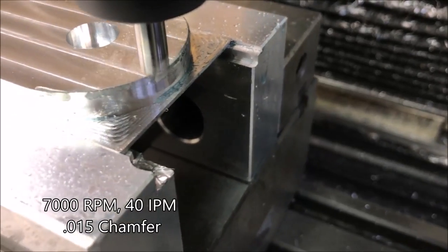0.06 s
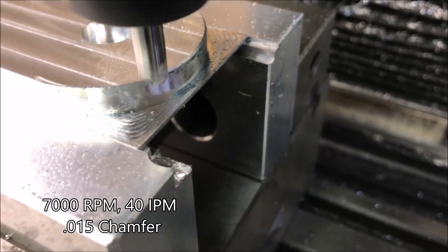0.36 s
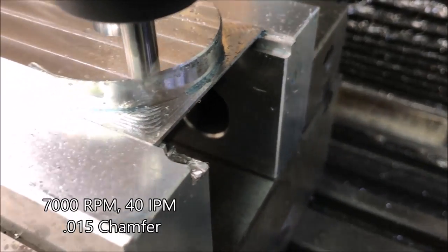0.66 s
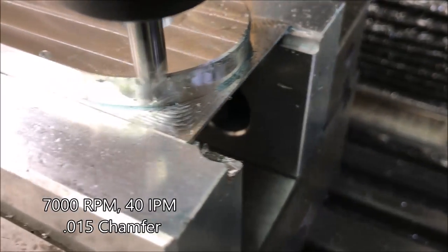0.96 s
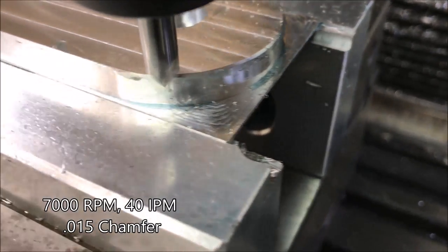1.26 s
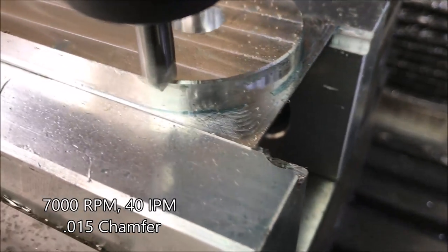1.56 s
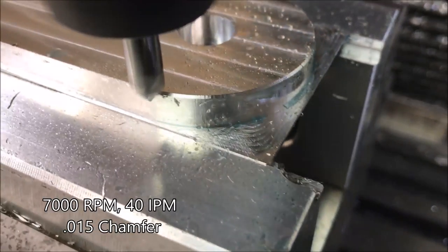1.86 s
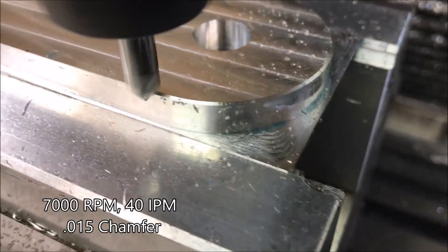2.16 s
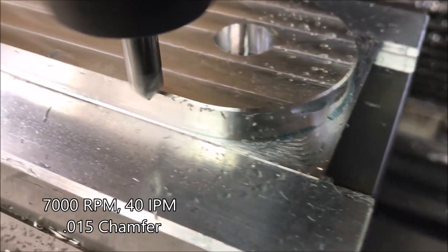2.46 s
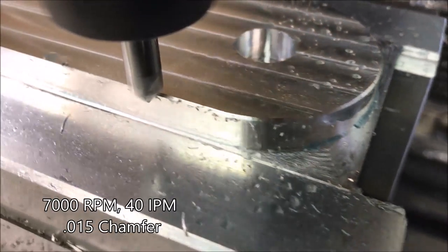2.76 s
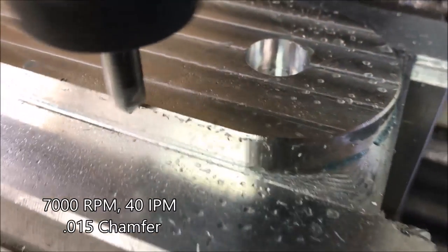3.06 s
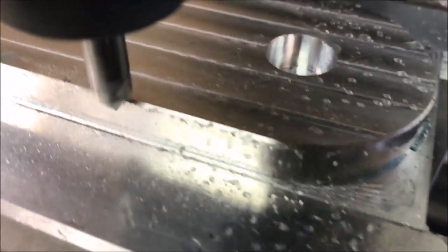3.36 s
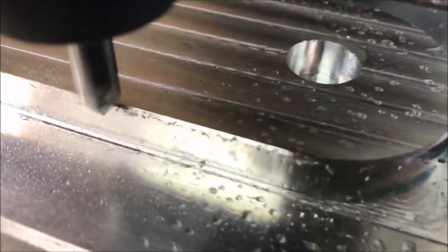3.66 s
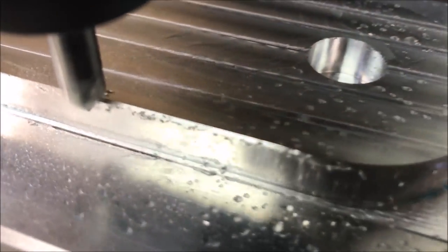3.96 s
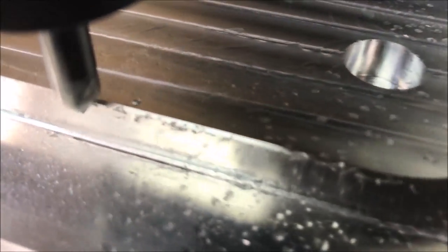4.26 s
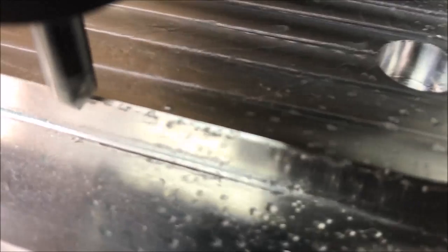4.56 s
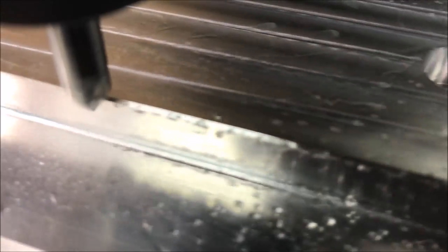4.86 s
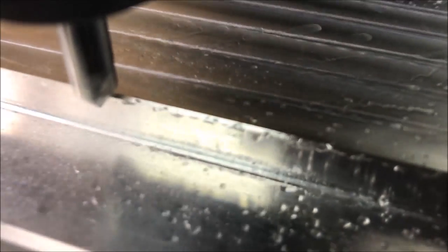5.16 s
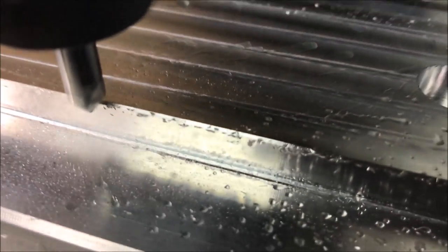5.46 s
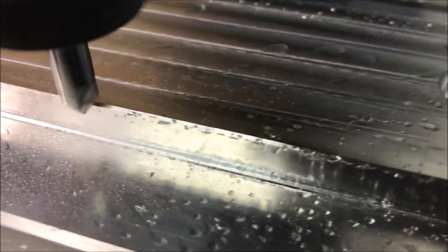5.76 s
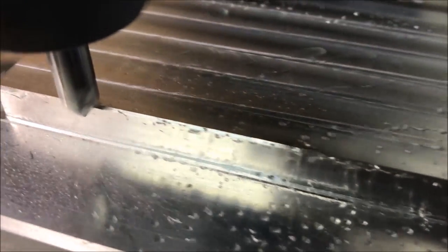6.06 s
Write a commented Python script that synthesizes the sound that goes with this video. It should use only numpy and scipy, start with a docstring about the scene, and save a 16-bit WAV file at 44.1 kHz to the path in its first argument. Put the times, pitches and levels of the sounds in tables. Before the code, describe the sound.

Coolant mist hisses close by over a humming milling machine, as the cutter rasps along metal and the spray starts to flutter.

```python
"""A milling machine chamfers an aluminium part in its enclosure, close to a hand-held mono microphone.
From the start, coolant mist hisses over panel rumble, motor hum and spindle tones, with a few dull bumps.
In the first second the cutter rounds a corner: the table's drive growls and the hum swells.
Then it settles into the straight edge, and the rasp of the chips and a feed whine come up.
From about 2 s the hiss flutters; throughout, echoes off nearby metal colour it as the microphone moves."""
import sys
import numpy as np
from scipy import signal
from scipy.fft import rfft, irfft, next_fast_len
from scipy.io import wavfile
from scipy.ndimage import map_coordinates

SR = 44100
rng = np.random.default_rng(int(sys.argv[2]) if len(sys.argv) > 2 else 0)


def store_pcm(level_fs):
    """Save levels as 16-bit WAV."""
    pcm = np.round(np.clip(level_fs, -1, 1) * 32767).astype(np.int16)
    wavfile.write(sys.argv[1], SR, np.atleast_2d(pcm).T)


N = 277830

# Brief dips in the hiss, the longer the deeper: (time [s], length [s])
HISS_DIPS = [(1.976, .012), (2.021, .014), (2.059, 0.011), (2.147, .01), (2.339, 0.016), (2.55, 0.015),
             (2.615, 0.017), (3.105, 0.01), (3.257, 0.0086), (3.395, 0.029), (3.639, 0.015), (3.865, 0.03),
             (4.085, 0.017), (4.153, 0.015), (4.281, 0.0095), (4.321, 0.011), (4.49, .013), (4.779, 0.024),
             (4.83, 0.01), (4.874, 0.01), (4.96, 0.015), (5.081, 0.025), (5.174, 0.0084), (5.243, 0.016),
             (5.282, 0.014), (5.623, 0.016), (5.771, 0.014), (5.867, 0.029), (5.955, 0.028), (6.049, 0.018),
             (6.136, 0.01)]
# The microphone drifts, leans in, holds and draws back: (time [s], proximity gain [dB])
PROXIMITY = [(0, 1), (1.7, -0.4), (2.9, 0), (4.4, 1.5), (5.25, 2.5), (5.5, -2.5), (6.3, -1)]


def amp(db):
    return 10 ** (np.asarray(db) / 20)


def unit(x):
    return x / np.sqrt(np.mean(x ** 2) + 1e-20)


def along(points, hz):
    """Reads (frequency [Hz], value) points on a log frequency axis."""
    point_hz, values = np.transpose(points)
    return np.interp(np.log(hz + 1), np.log(point_hz + 1), values)


def automation(points):
    """One value a sample from (time [s], value) points."""
    return np.interp(np.arange(N) / SR, *np.transpose(points))


def settled(corner_db, straight_db):
    """A level that moves from its corner value towards its straight-edge value."""
    # The cutter settles into the straight cut: (time [s], engagement [0-1])
    engagement = [(0.85, 0), (1.5, 0.48), (2.5, 0.72)]
    return corner_db + (straight_db - corner_db) * automation(engagement)


def swell(middle_s, length_s, edge):
    """Rises from 0 to 1 and falls back; a higher edge gives steeper flanks."""
    return np.exp(-np.abs(2 * (np.arange(N) / SR - middle_s) / length_s) ** edge)


def wobble(rate):
    """A smooth random curve, rate knots a second."""
    knots = rng.standard_normal(int(N * rate / SR) + 4)
    return map_coordinates(knots, [np.arange(N) * rate / SR])


def ripple(hz, t, step_hz, rate):
    """Fine random spectral peaks that drift in time, rms 1."""
    knots = rng.standard_normal((1024, 128))
    grid = np.meshgrid(hz / step_hz, t * rate, indexing="ij")
    return unit(map_coordinates(knots, grid, mode="mirror"))


def filtered(x, response):
    """x through a frequency response."""
    size = next_fast_len(N + SR // 2)
    return irfft(rfft(x, size) * response(np.fft.rfftfreq(size, 1 / SR)), size)[..., :N]


def coloured(x, spectrum):
    """x through an EQ of (frequency [Hz], gain [dB]) points, at rms 1."""
    return unit(filtered(x, lambda hz: amp(along(spectrum, hz))))


def tone(hz):
    """A sine of rms 1 that follows a pitch curve."""
    return np.sqrt(2) * np.sin(2 * np.pi * (np.cumsum(hz) / SR + rng.random()))


def spatter(rate, spread_db):
    """Tiny impacts of random size, about rate a second, rms 1."""
    clicks = (rng.random(N) < rate / SR) * rng.choice([-1, 1], N)
    return unit(clicks * amp(spread_db * rng.uniform(-1.3, 1, N)))


def enclosure(near_db, lumps_db=2.3, growl_db=-51):
    """The panels rumble unevenly and carry the growl of the table's drive round the corner."""
    # Spectra of the panels and of the drive: (frequency [Hz], relative level [dB])
    rumble_eq = [(15, -29), (32, -6), (48, -1.5), (80, 3), (130, -1), (200, -3), (320, -4.5), (480, -16.5),
                 (900, -32), (3000, -66)]
    growl_eq = [(120, -40), (210, 0.5), (270, 14), (320, -17), (400, -11), (700, -45)]
    # Rumble before proximity gain: (corner level [dB], straight-edge level [dB])
    rumble_db = (-51.5, -53)
    rumble = unit(amp(lumps_db * wobble(18)) * coloured(rng.standard_normal(N), rumble_eq))
    growl = swell(middle_s=0.63, length_s=0.59, edge=4.8) * coloured(rng.standard_normal(N), growl_eq)
    return amp(settled(*rumble_db) + near_db) * rumble + amp(growl_db) * growl


def motor(hum_hz=57.9, swell_db=7, waver_db=0.9, drift=0.0065):
    """A motor's unbalance hums through the frame and swells in the turn of the corner."""
    # Hum before the swell: (corner level [dB], straight-edge level [dB])
    hum_db = (-53, -48.5)
    level_db = settled(*hum_db) + swell_db * swell(middle_s=0.89, length_s=0.74, edge=2.5)
    return amp(level_db + waver_db * wobble(11)) * tone(hum_hz * (1 + drift * wobble(7.6)))


def bumps(attack_s=0.0002):
    """Dull knocks, each a few heavily damped cycles."""
    # Knocks: (time [s], level [dB], pitch [Hz], 60 dB decay time [s])
    knocks = [(0.103, -28, 141, 0.019), (0.159, -23, 380, 0.017), (0.163, -34, 150, 0.047),
              (0.231, -33, 200, 0.022), (1.011, -36, 400, 0.038), (1.487, -28, 111, 0.025),
              (4.14, -35.5, 157, 0.071), (4.302, -37, 135, 0.13)]
    out = np.zeros(N + SR)
    t = np.arange(SR // 4) / SR
    for start_s, db, hz, t60 in knocks:
        envelope = np.exp(-np.log(1000) * t / t60) * (1 - np.exp(-t / attack_s))
        out[round(start_s * SR):][:len(t)] += amp(db) * envelope * np.sin(2 * np.pi * hz * t)
    return out[:N]


def drives(spindle_hz=128.45, waver_db=2.5, drift=0.00095):
    """Spindle harmonics and drive whines change balance as the cutter leaves the corner."""
    # Spindle: (harmonic [x spindle speed], level running light [dB], level in the cut [dB])
    harmonics = [(2, -65, -65), (3, -67, -67), (4, -66, -60.5), (6, -74, -63), (8, -64, -85)]
    # Pumps and feed drives: (pitch [Hz], corner level [dB], straight-edge level [dB])
    whines = [(114.6, -57, -59.5), (1410, -68, -57), (1796, -59, -98), (2104, -67, -70), (2170, -70, -103),
              (2856, -69, -85.5), (3910, -71, -82)]
    speed = 1 + drift * wobble(6)
    partials = [(round(k) * spindle_hz, light, cut) for k, light, cut in harmonics] + list(whines)
    return sum(amp(settled(corner, straight) + waver_db * wobble(3.26)) * tone(hz * speed)
               for hz, corner, straight in partials)


def cutter(near_db, chips_db=-8, ring_db=1.7):
    """Chips tear off; the scraping rings shifting modes of the part and the vice."""
    # Spectrum of the cut: (frequency [Hz], relative level [dB])
    rasp_eq = [(200, -27), (450, -13.5), (600, -7.5), (740, -10), (900, -4.5), (1120, -3.5), (1340, 0),
               (1500, -3.5), (1680, -13), (1880, -9), (2400, -18), (4000, -34), (8000, -89)]
    # Rasp before proximity gain: (corner level [dB], straight-edge level [dB])
    rasp_db = (-47.5, -40.5)
    scrape = rng.standard_normal(N) + amp(chips_db) * spatter(rate=650, spread_db=2.5)
    hz, t, spectrum = signal.stft(scrape, SR, nperseg=2048)
    modes = amp(ring_db * ripple(hz, t, step_hz=45.1, rate=16))
    ringing = signal.istft(spectrum * modes, SR, nperseg=2048)[1][:N]
    return amp(settled(*rasp_db) + near_db) * coloured(ringing, rasp_eq)


def near_echoes(hz, t, sound_cm_per_s=34300):
    """A moving comb filter: echoes off four nearby metal faces add to the direct sound."""
    # Detour of each echo: (time [s], then an extra path [cm] for each face)
    echo_paths = [(0, 4.5, 18.6, 14.3, 17.2), (1.7, 3.9, 18.8, 13.8, 12.0), (2.9, 4.4, 20, 13.6, 11.6),
                  (3.6, 6.1, 11.2, 16, 11.3), (4.4, 4.85, 12.1, 14.5, 9.7), (5.25, 4.85, 12, 20, 9.2),
                  (5.55, 9.5, 16.24, 21.85, 9.1), (6.3, 9.8, 16, 21, 10.2)]
    # Strength of each echo: (signed amplitude [x direct sound])
    echo_gains = [-0.14, -0.15, 0.098, 0.094]
    times, *paths_cm = np.transpose(echo_paths)
    delays_s = [np.interp(t, times, cm) / sound_cm_per_s for cm in paths_cm]
    return 1 + sum(gain * np.exp(-2j * np.pi * np.outer(hz, delay))
                   for gain, delay in zip(echo_gains, delays_s))


def mist(level_db=-36.5, swell_db=0.86, drops_db=-15, ripple_db=1.98, shimmer_db=0.5):
    """Turbulent air and droplets, combed by the near echoes and rippled by many far ones."""
    # Spectrum of the coolant jet: (frequency [Hz], relative level [dB])
    jet_eq = [(100, -28), (400, -4.5), (1700, -1), (2400, -3.5), (3100, 0.4), (4400, -4.5), (5020, -7.5),
              (5600, -2.5), (7500, -3.5), (9400, 2.8), (10400, -5), (11700, 1), (12600, 0.8), (13500, -0.6),
              (15700, 3)]
    # Bands that lift close to the work: (centre [Hz], half width [Hz], boost [dB per dB of proximity])
    near_bands = [(7080, 180, 1.5), (11300, 600, 1.6)]
    jet = rng.standard_normal(N) + amp(drops_db) * spatter(rate=200, spread_db=8.5)
    hz, t, spectrum = signal.stft(jet, SR, nperseg=1024)
    near_db = np.maximum(np.interp(t, *np.transpose(PROXIMITY)), 0)
    bands_db = sum(boost * np.outer(np.exp(-((hz - centre) / width) ** 2), near_db)
                   for centre, width, boost in near_bands)
    reflections_db = ripple_db * ripple(hz, t, step_hz=85.0, rate=2.085)
    colour = near_echoes(hz, t) * amp(along(jet_eq, hz)[:, None] + bands_db + reflections_db)
    hiss = signal.istft(spectrum * colour, SR, nperseg=1024)[1][:N]
    envelope_db = level_db + swell_db * swell(middle_s=3.27, length_s=1.34, edge=3.6)
    return amp(envelope_db + shimmer_db * wobble(25.54)) * unit(record(hiss))


def flutter(x, dip_db=-10.5, deeper_db_per_s=-780, edge_per_s=125, bass_hz=125):
    """Above the bass the level ducks briefly: short dips are pointed, long ones flat at the bottom."""
    duck_db = sum((dip_db + deeper_db_per_s * length) * swell(middle_s, length, edge_per_s * length)
                  for middle_s, length in HISS_DIPS)
    bass = filtered(x, lambda hz: np.exp(-(hz / bass_hz) ** 2))
    return bass + amp(duck_db) * (x - bass)


def flicker(scatter=0.075, outlast_s=0.026, spread_db=3.0, louder_db_per_s=60, trim_db=-1.3):
    """A handful of faint watery tones swell through each dip, louder in the long ones."""
    # Tones, scattered anew in each dip: (centre pitch [Hz], base level [dB])
    watery_tones = [(700, -57), (1100, -46), (1330, -44.5), (1900, -52.5), (2900, -53.5), (3550, -52.5),
                    (8000, -52.5), (9100, -48), (9700, -51), (11600, -48.5), (12600, -54), (13800, -49),
                    (15000, -47)]
    centre_hz, tone_db = np.transpose(watery_tones)
    out = np.zeros(N + SR)
    for middle_s, length in HISS_DIPS:
        detune, strength = rng.standard_normal((2, len(watery_tones)))
        hz = centre_hz * np.exp(scatter * detune)
        gains = amp(tone_db + trim_db + louder_db_per_s * length + spread_db * strength)
        t = np.arange(round((length + outlast_s) * SR)) / SR
        chord = gains @ np.sin(2 * np.pi * (np.outer(hz, t) + rng.random((len(hz), 1))))
        fade = np.sin(np.pi * t / t[-1])
        out[round((middle_s - t[-1] / 2) * SR):][:len(t)] += np.sqrt(2) * chord * fade
    return out[:N]


def scene():
    """One microphone hears it all, alike in both channels; rasp and rumble grow as it leans in."""
    near_db = automation(PROXIMITY)
    rush = mist() + cutter(near_db) + enclosure(near_db) + drives()
    mono = flutter(rush) + flicker() + motor() + bumps()
    return np.array([mono, mono])


def record(dry, top_hz=15750):
    """A brick-wall low-pass takes off the very top."""
    return filtered(dry, lambda hz: hz < top_hz)


dry = scene()
out = record(dry)
store_pcm(out)
```